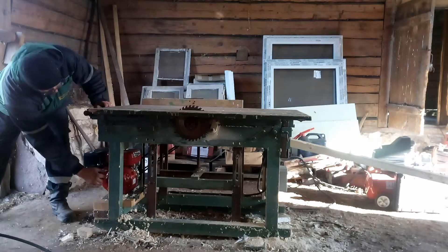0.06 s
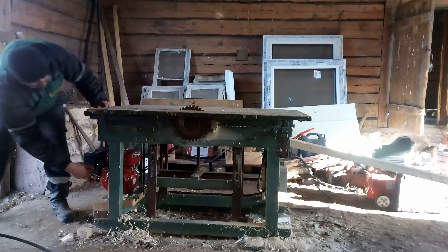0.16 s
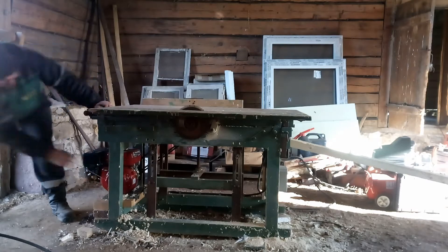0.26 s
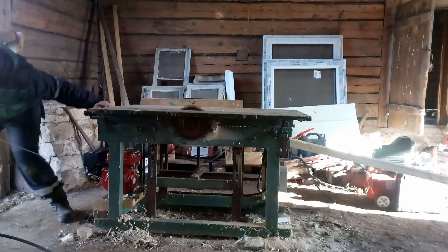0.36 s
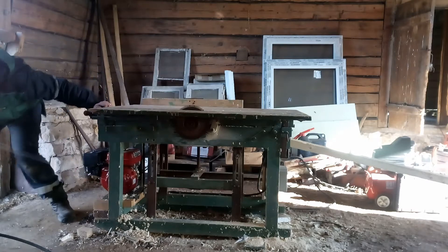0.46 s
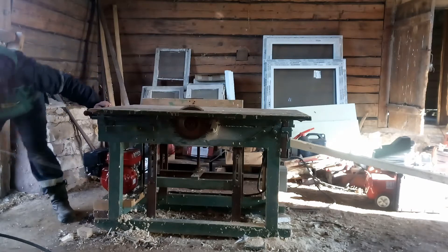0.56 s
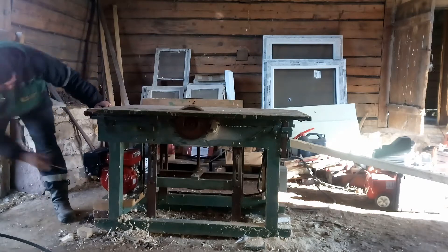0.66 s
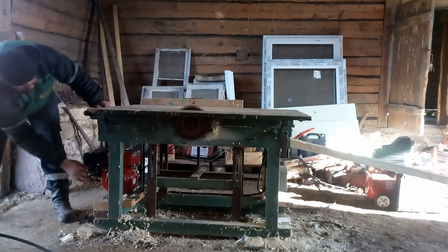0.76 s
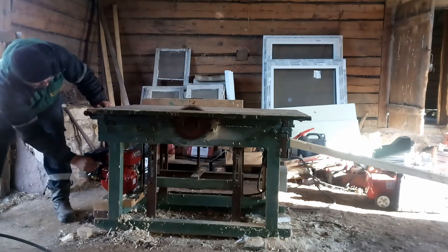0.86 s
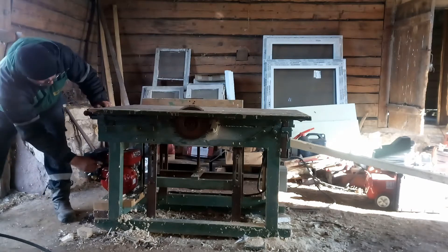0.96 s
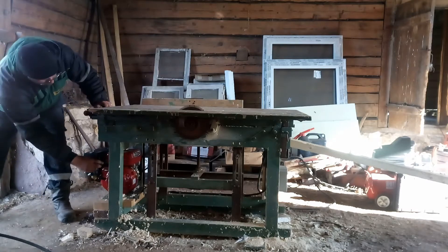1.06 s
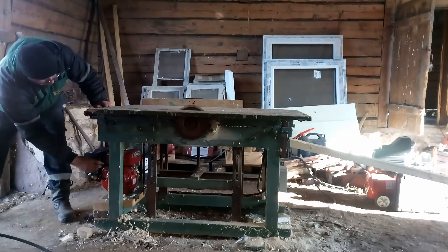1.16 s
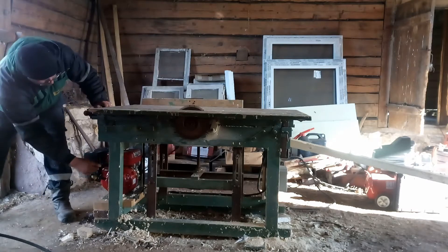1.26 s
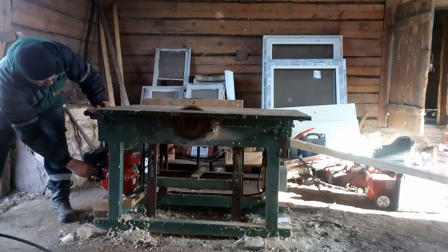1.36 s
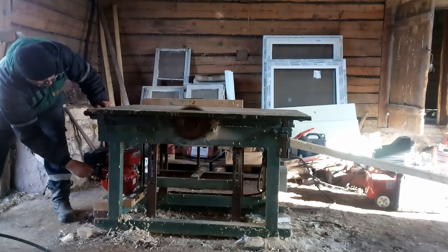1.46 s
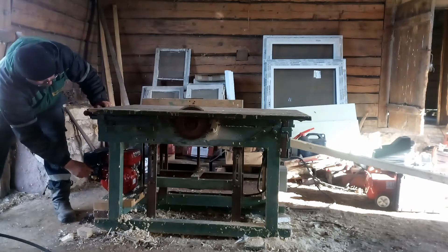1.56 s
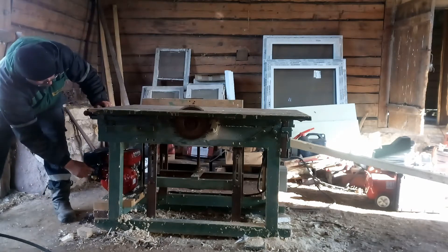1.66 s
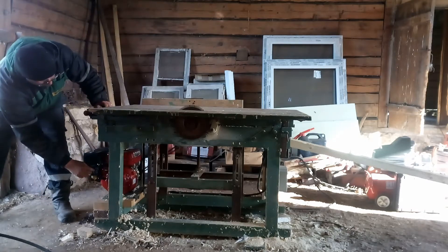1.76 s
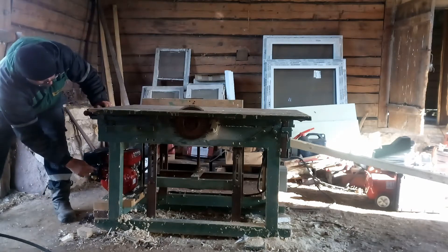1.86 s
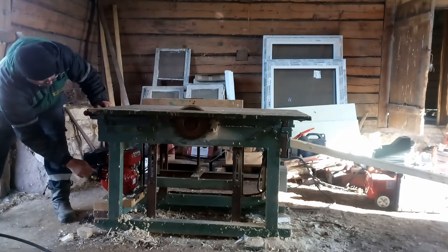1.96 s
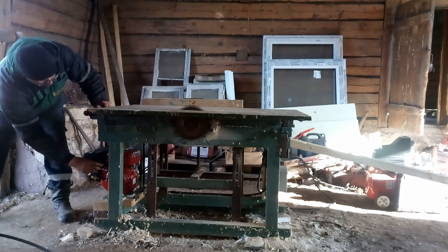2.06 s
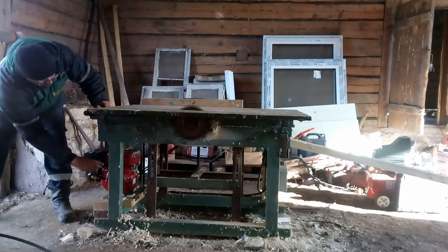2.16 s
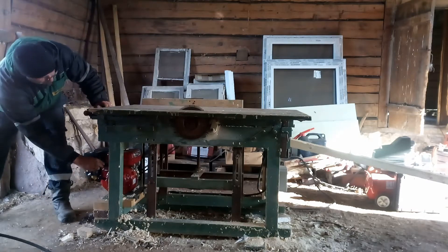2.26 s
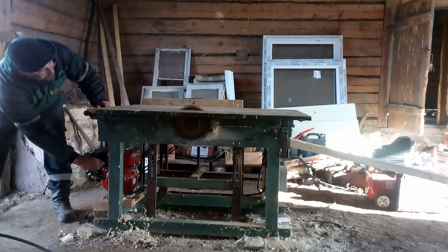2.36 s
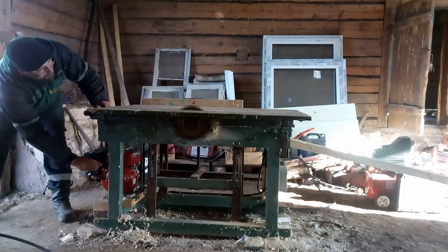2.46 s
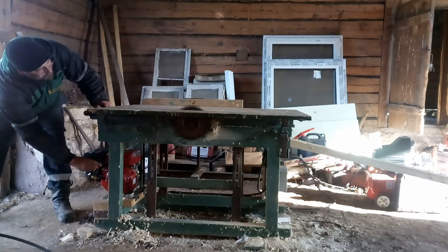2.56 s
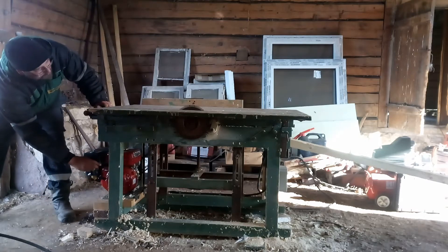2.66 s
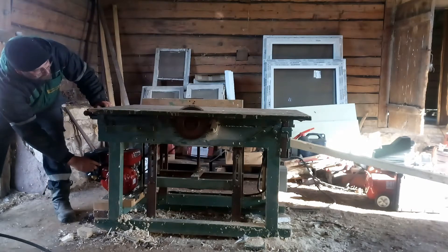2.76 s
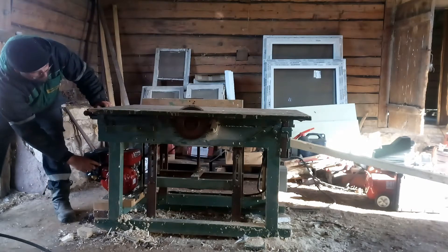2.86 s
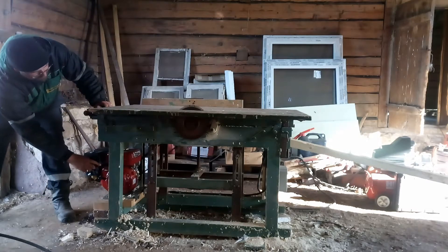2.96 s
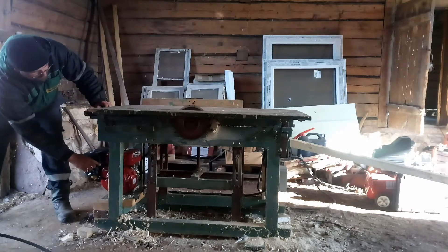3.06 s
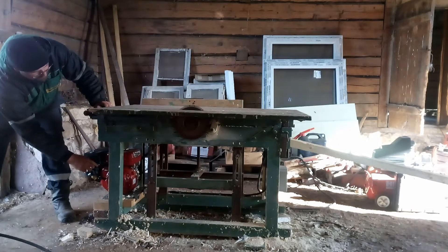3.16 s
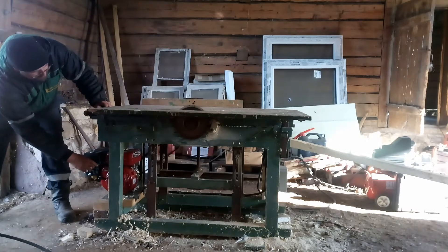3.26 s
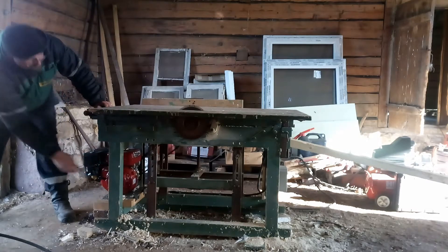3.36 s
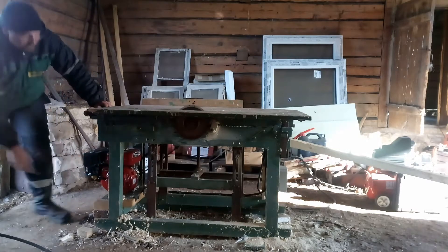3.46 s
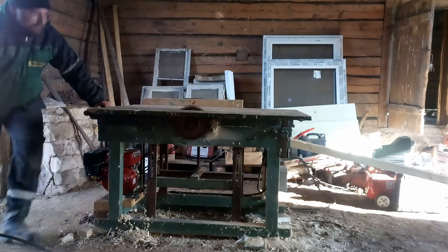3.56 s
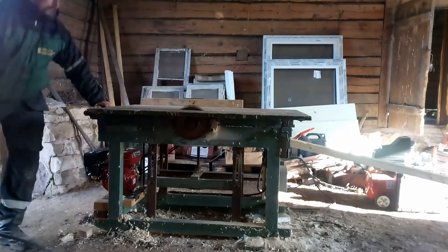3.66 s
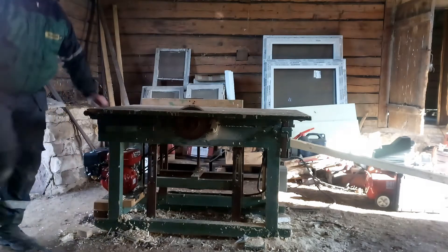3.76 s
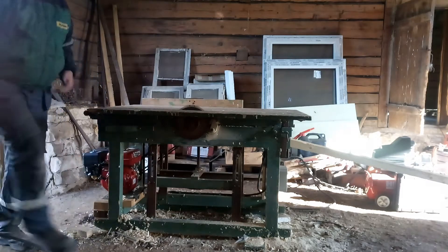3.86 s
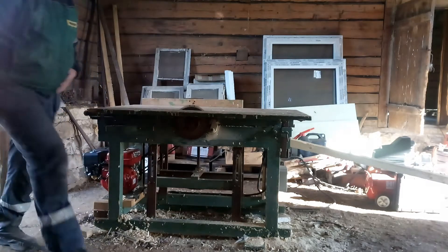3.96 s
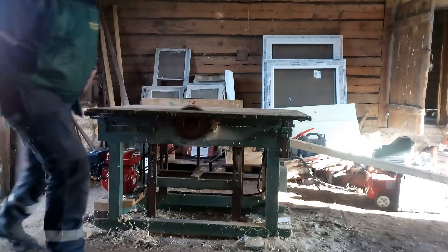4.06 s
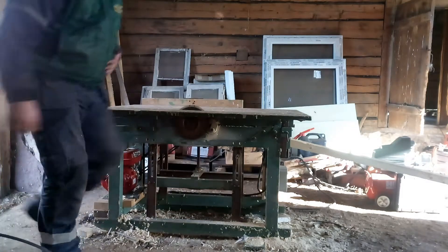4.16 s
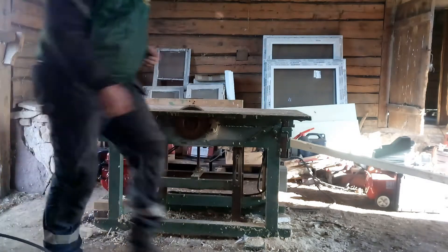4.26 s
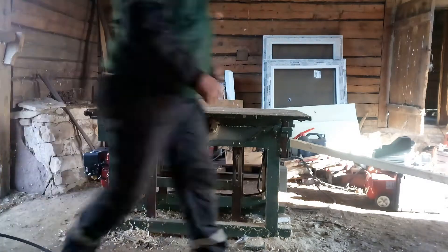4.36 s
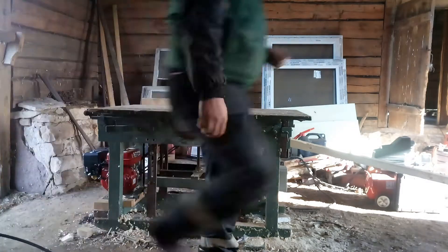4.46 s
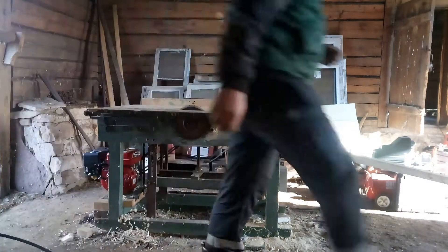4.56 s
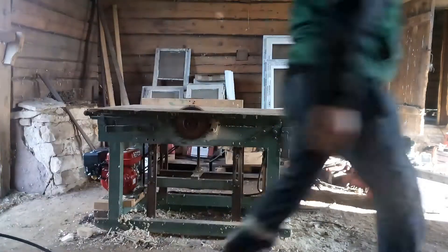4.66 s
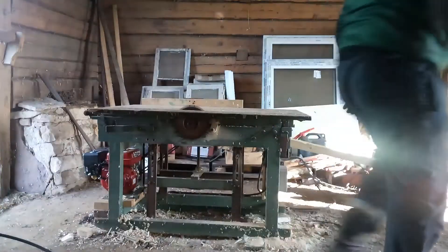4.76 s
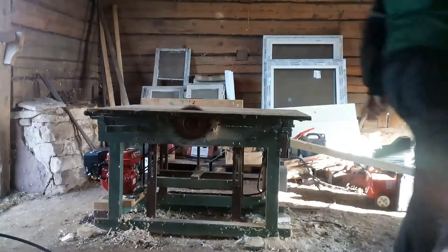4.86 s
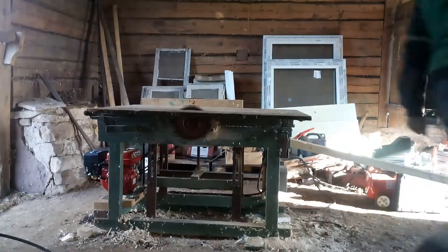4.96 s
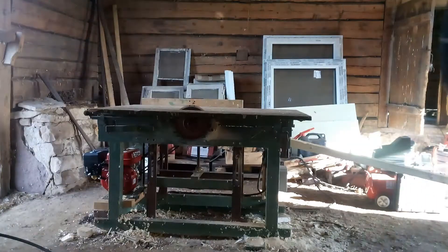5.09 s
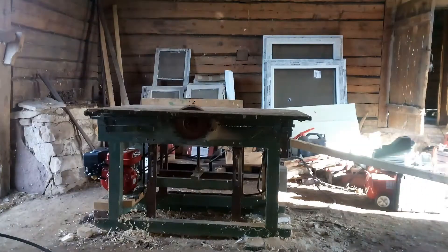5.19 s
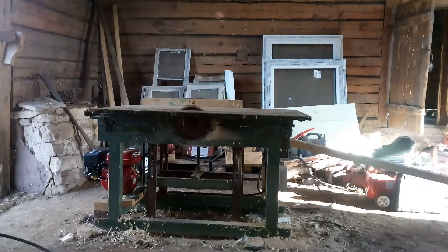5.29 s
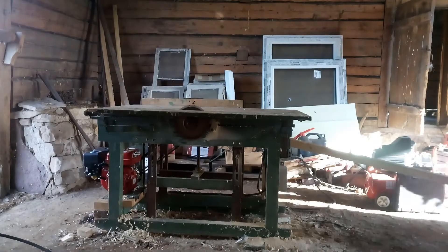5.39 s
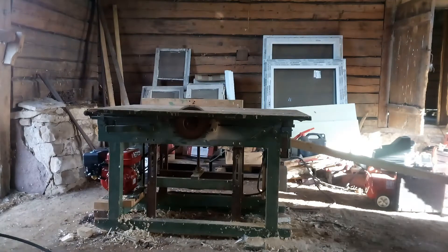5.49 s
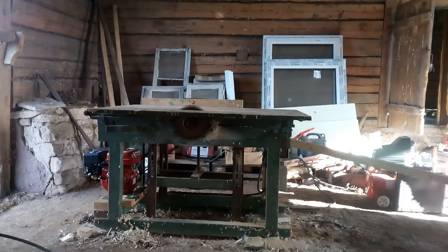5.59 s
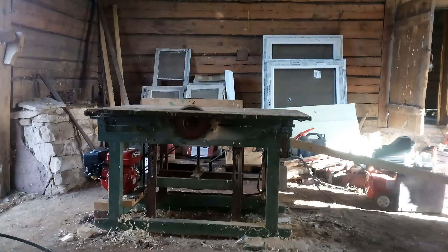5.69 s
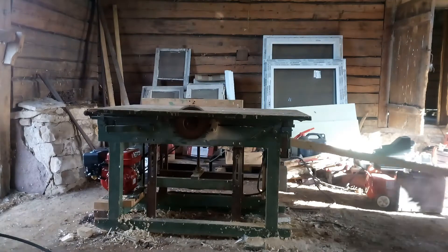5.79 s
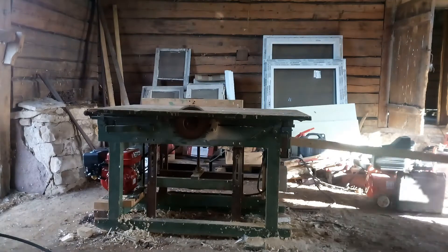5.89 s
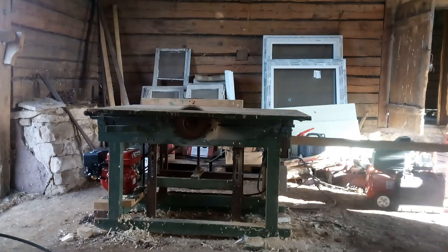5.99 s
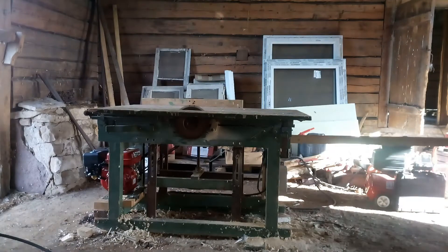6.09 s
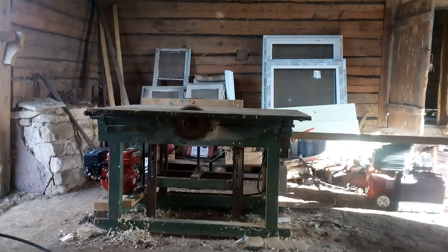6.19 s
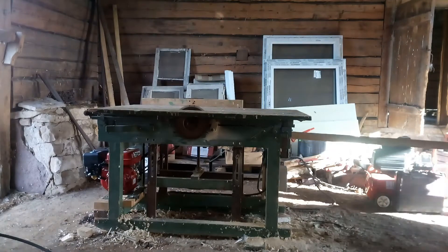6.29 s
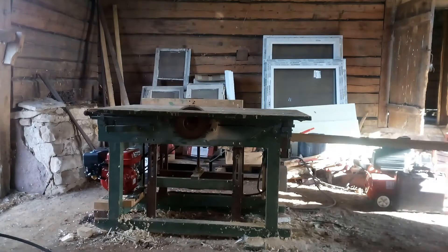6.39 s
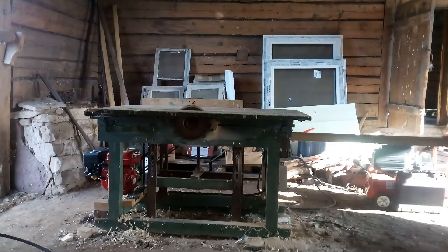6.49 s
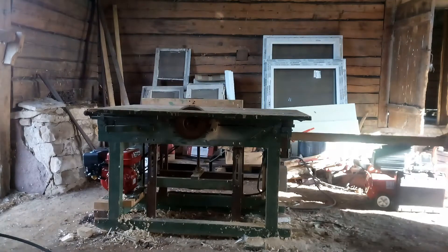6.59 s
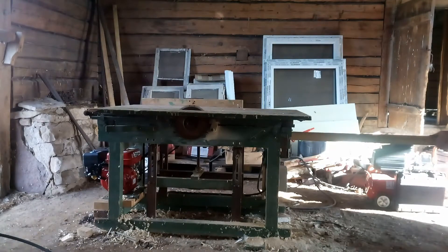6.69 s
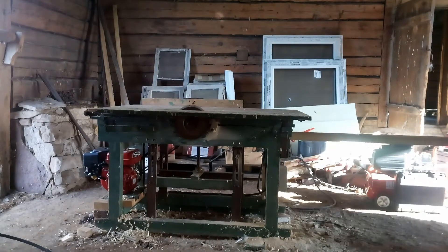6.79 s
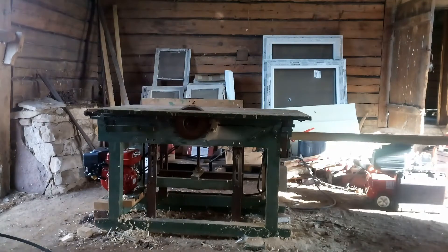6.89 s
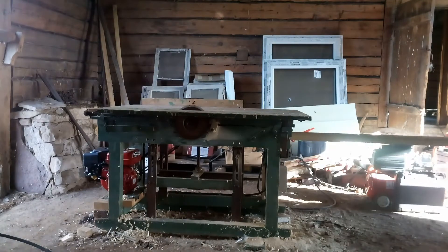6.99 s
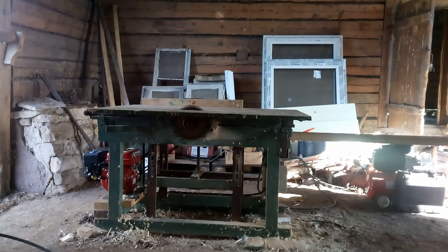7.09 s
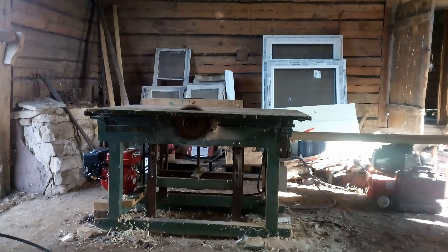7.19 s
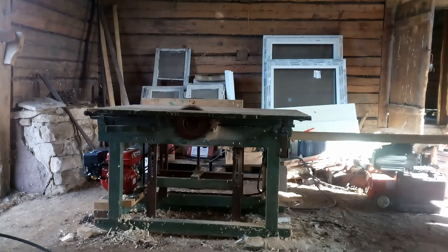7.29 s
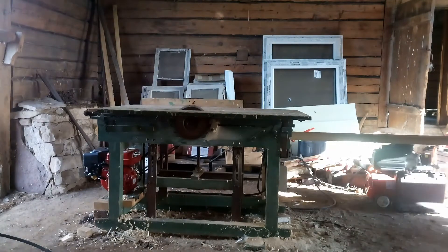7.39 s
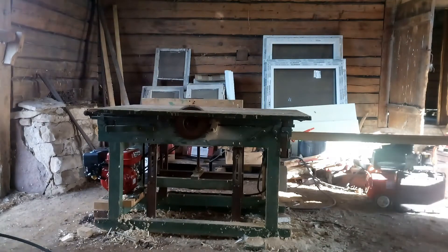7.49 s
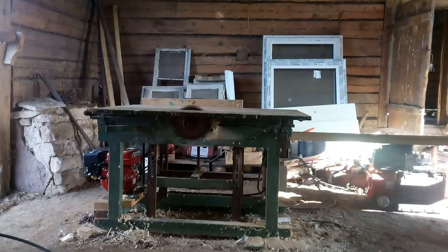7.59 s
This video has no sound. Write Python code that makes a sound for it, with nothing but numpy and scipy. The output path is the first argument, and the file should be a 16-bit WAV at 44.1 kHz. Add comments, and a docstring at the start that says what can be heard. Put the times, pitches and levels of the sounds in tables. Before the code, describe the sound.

The barn is almost silent, with faint air. At 0.1-0.2 s metal pawls clink and a dull bench knock lands. Around 0.25-0.4 s a starter rope makes a rough, rising zip, ending in hard knocks near 0.4 s. A small single-cylinder engine turns over with uneven deep pops; the rope reel chatters back at about 0.8 s with metallic clacks. The engine stumbles, gives a small rev around 1.45-1.6 s amid a few knocks, and settles to a soft, low putter by 1.9 s. At 2.4 s the throttle opens into a raspy roar, and again at 3.1 s. From about 3.2 s to the end near 7.5 s it runs fast and loud under load, a boomy three-beat chug with slight speed hunting, barking muffler, tinny valve clatter, loose rattles, and the wavering ring of the spinning saw blade. Short wooden-room echo, distant fixed microphone.

```python
"""Pull-started engine and bench saw in a barn

A rope clinks, zips and knocks through its starter; a single-cylinder four-stroke stumbles, with one small throttle
blip, and settles to a chug. Two wide blips come after; then the speed hunts on the governor and a belt-driven
saw rings. Each engine cycle sends out short pulses; filters turn them into boom, bark and clatter, with barn echo.
Shaped noise makes the gas, rattles and scrapes; wavering sine waves make the metal ring."""
import sys
import numpy as np
from scipy import signal
from scipy.fft import rfft, irfft
from scipy.io import wavfile
from scipy.ndimage import uniform_filter1d

SR = 44100
rng = np.random.default_rng(int(sys.argv[2]) if len(sys.argv) > 2 else 0)


def int16_out(signal):
    """Quantize to a 16-bit WAV file."""
    q = np.round(np.clip(np.atleast_2d(signal).T, -1, 1) * 32767)
    wavfile.write(sys.argv[1], SR, q.astype(np.int16))


N = 336924
T = np.arange(N) / SR  # time of each sample [s]


def undb(db):
    """Turn decibels into a gain."""
    return 10 ** (np.asarray(db) / 20)


def unit(x):
    """Scale to an average (rms) strength of 1."""
    return x / np.sqrt(np.mean(x ** 2) + 1e-20)


def even(x, size=9000):
    """Hold the running rms, over a window in samples, near 1 while keeping the single beats."""
    power = uniform_filter1d(uniform_filter1d(x * x, size), size)
    return x / np.sqrt(power + 1e-14)


def noise():
    """White noise: all pitches equally strong."""
    return rng.standard_normal(N)


def sway(hz):
    """Random wander with a spread of 1, made of noise below the given frequency."""
    return unit(signal.sosfilt(signal.butter(2, hz, fs=SR, output="sos"), noise()))


def ramp(start_s, rise_s):
    """A straight rise from 0 to 1."""
    return np.clip((T - start_s) / rise_s, 0, 1)


def fade(x, decay_s):
    """Give each pulse a tail that dies away exponentially."""
    return signal.lfilter([1], [1, -np.exp(-1 / (decay_s * SR))], x)


def colour(x, points, size=4096):
    """Filter to a (frequency [Hz], level [dB]) curve without sounding ahead of the input."""
    hz, db = np.transpose(points)
    f = np.log(np.maximum(np.fft.rfftfreq(size, 1 / SR), 1))
    # the response falls away beyond both ends of the curve
    outside = np.maximum(f - np.log(hz[-1]), 0) + np.maximum(np.log(hz[0]) - f, 0)
    response_db = np.interp(f, np.log(hz), db) - 20 * outside
    # folding the cepstrum gives the minimum-phase filter
    cepstrum = irfft(np.log(undb(response_db)))
    cepstrum[1:size // 2] *= 2
    cepstrum[size // 2 + 1:] = 0
    return signal.oaconvolve(x, irfft(np.exp(rfft(cepstrum))))[:N]


def resonate(x, hz, width_hz):
    """A resonance picks out one narrow band and rings on."""
    return signal.lfilter(*signal.iirpeak(hz, hz / width_hz, fs=SR), x)


BARN_T60_S = 0.4  # time for the echo to fall by 60 dB


def barn(x, wet_db):
    """Direct sound plus the dense, short echo of the plank walls."""
    t = T[:SR // 2]
    dying = np.exp(-np.log(1000) * t / BARN_T60_S)
    tail = rng.standard_normal(len(t)) * dying * (t > .004)
    echo = signal.oaconvolve(x, tail / np.linalg.norm(tail))[:N]
    return x + undb(wet_db) * echo


def blow(s, db, decay_s):
    """Loose parts meet one after another: a knock swells, slower if light, then dies away."""
    swell_s = np.interp(db, [-58, -45], [.018, .006])
    past_peak = T - s - .005  # the peak comes 5 ms after the listed time
    swell = np.clip(1 + past_peak / swell_s, 0, 1)
    return undb(db) * np.exp(-np.clip(past_peak / decay_s, 0, 50)) * swell


def ringing(modes, waver):
    """Metal modes that waver in pitch as parts rattle against them."""
    out = 0
    for hz, db in modes:
        phase = 2 * np.pi * np.cumsum(hz * (1 + waver * sway(hz=201))) / SR
        out = out + undb(db) * np.sin(phase)
    return unit(out)


def strokes(cycle, at, scatter_db, jitter_s):
    """One pulse a cycle at a given position, each with its own strength and timing."""
    count = np.arange(np.ceil(cycle[0]), np.floor(cycle[-1]))
    chance = rng.standard_normal((200, 2))[:len(count)]
    when = np.interp(count + at, cycle, T) + jitter_s * chance[:, 0]
    sample = np.clip(when * SR, 0, N - 1).astype(int)
    return np.bincount(sample, undb(scatter_db * chance[:, 1]), N)


# starter pawls dropping into the cup: (time [s], level [dB], decay [s])
PAWL_CLICKS = [(0.121, -49, 0.012), (.134, -35.5, 0.0077), (.16, -48, 0.009)]
# ringing modes of the starter cup: (frequency [Hz], level [dB])
CUP_MODES = [(660, 10), (813, 4), (980, 8), (1080, -5), (1500, -23), (1943, -15), (2929, -12), (3350, -16),
             (3700, -18), (4400, -22)]


def pawls():
    """The pawls clink against the starter cup as the slack is taken up."""
    clicks = sum(blow(s, db, decay) for s, db, decay in PAWL_CLICKS)
    return clicks * ringing(CUP_MODES, waver=0.015)


# knocks of starter and controls, with light valve ticks as the engine stumbles;
# ring and rattle are relative to the knock:
# (time [s], level [dB], decay [s], metallic ring [dB], rattle [dB])
KNOCKS = [(0.138, -32.5, 0.029, -29, -39), (0.162, -51, 0.017, -16, -34.5), (0.385, -45, 0.02, -7, -3),
          (0.407, -31.5, 0.015, -0.5, -6.5), (0.435, -26, 0.0061, -12, -31), (.576, -64, 0.011, 5, -1),
          (.664, -62.5, 0.01, 5, 2), (.737, -60, .009, 6, -5), (0.772, -45, 0.0066, 2, -2),
          (0.783, -41, 0.013, 18, -2), (0.811, -37.5, 0.0084, 4.5, -16.5), (0.881, -61, 0.0073, 3, 2),
          (.944, -57, 0.011, 10, -4), (1.015, -61, 0.01, 2, 1.5), (1.084, -55, 0.0083, 0, -0.5),
          (1.15, -58.5, 0.0091, 1, -1), (1.453, -49.5, 0.0088, 0.5, -2), (1.526, -39.5, 0.028, -1.5, -20),
          (1.571, -47.5, 0.012, -8, 4.5), (1.645, -44, 0.022, 6, -11)]
# ringing modes of the starter housing: (frequency [Hz], level [dB])
HOUSING_MODES = [(441, 7.5), (646, 2), (908, -5.5), (1036, -4.5), (1114, 0), (1310, -5.5), (1510, -9),
                 (2000, -16), (2295, -14.5), (2680, -26), (3880, -16), (5030, -28), (6100, -31)]
# colour of the dull part of a knock: (frequency [Hz], level [dB])
THUD_COLOUR = [(60, -42), (140, -27), (188, 14.5), (260, -3), (640, -2), (1000, -13.5), (1600, -23.5),
               (2300, -43.5), (3300, -31), (5000, -47)]
# colour of the bright part of a knock: (frequency [Hz], level [dB])
RATTLE_COLOUR = [(600, 12.5), (1500, 11), (3400, 3), (5500, -6.5), (8000, -16.5), (13000, -29),
                 (15500, -17)]
BENCH_HZ = 188.5  # pitch of the bench's boom


def knocks():
    """Starter and controls knock and valves tick lightly: thud, bench boom, metal ring and rattle."""
    dull, metal, bright = np.zeros((3, N))
    for s, db, decay, ring_db, rattle_db in KNOCKS:
        hit = blow(s, db, decay)
        dull += hit
        metal += hit * undb(ring_db)
        bright += hit * undb(rattle_db)
    thud = even(colour(noise(), THUD_COLOUR), size=900) + 0.4 * np.sin(2 * np.pi * BENCH_HZ * T)
    rattle = unit(colour(noise(), RATTLE_COLOUR))
    return dull * thud + metal * ringing(HOUSING_MODES, waver=0.014) + bright * rattle


# muffler and barn colour at slow idle: (frequency [Hz], level [dB])
BOOM_SLOW = [(20, -16.5), (48, -17.5), (73, -5), (100, -4), (140, -7.5), (200, -0.5), (245, -1),
             (310, -17.5), (450, -35)]
# muffler and barn colour under load: (frequency [Hz], level [dB])
BOOM_FAST = [(20, -11), (48, -17), (64, -19.5), (85, -1), (105, -2), (128, -4), (160, 4), (192, -4),
             (215, 3.5), (260, -9.5), (320, -17.5), (450, -38)]
# puffs of one cycle under load: (position [cycles], level [dB], scatter [dB])
PUFFS = [(0, 0.5, 0.46), (0.334, -5.5, 1.6), (0.665, -3, 2)]
# muffler and barn modes the puffs keep humming: (frequency [Hz], width [Hz], gain [dB])
HUM_MODES = [(128.9, 7, -1.5), (194, 13, -5)]


def exhaust(cycle, load, opening):
    """Exhaust and intake puffs boom: a soft putter, a roar in a blip, a three-beat chug under load."""
    firing = strokes(cycle, 0, scatter_db=0.0, jitter_s=0.0004)
    intake = strokes(cycle, 0.4614, scatter_db=3.0, jitter_s=0.00057)
    turbulence = (.5 + .8 * opening) * noise()
    putts = even(barn(firing + .68 * intake, wet_db=-4.0)) + turbulence
    puffs = 0
    for at, db, scatter in PUFFS:
        puffs = puffs + undb(db) * strokes(cycle, at, scatter_db=scatter, jitter_s=0.00018)
    hum = sum(undb(db) * resonate(puffs, hz, width) for hz, width, db in HUM_MODES)
    chug = even(barn(puffs, wet_db=-5.5) + hum) + .38 * noise()
    slow = unit(colour(putts, BOOM_SLOW))
    loaded = unit(colour(chug, BOOM_FAST))
    return even((1 - load) * slow + load * loaded)


# colour of the shaken muffler shell and bench: (frequency [Hz], level [dB])
BARK_COLOUR = [(200, -28.5), (300, 0.5), (380, 1), (460, -3), (600, -6.5), (720, -10), (1000, -11.5),
               (1200, -16), (1400, -20.5), (1800, -29), (2500, -41.5)]


def bark(cycle):
    """Each stroke shakes the muffler shell and bench, with a rush of gas behind it."""
    hits = strokes(cycle, 0, scatter_db=0.5, jitter_s=0.00017)
    for at, db in [(.17, -4), (.45, -0.5), (.62, -2.5), (.84, -3)]:  # (position in cycles, dB)
        hits = hits + undb(db) * strokes(cycle, at, scatter_db=2.2, jitter_s=0.00023)
    gas = unit(fade(hits, decay_s=0.018) * noise())
    # the muffler faces the wall, so its knocks arrive mostly as echo
    return even(colour(unit(barn(hits, wet_db=17.0)) + 0.9 * gas, BARK_COLOUR))


# colour of the clatter as a whole: (frequency [Hz], level [dB])
CLATTER_COLOUR = [(1100, -20), (1700, 1), (2000, 7.5), (2350, 4), (2550, -2), (2950, 0.5), (3500, -3.5),
                  (4200, -6.5), (5100, -11), (5900, -15.5), (6800, -31.5), (7800, -25), (10000, -29.5),
                  (13500, -38.5), (15200, -23)]
# resonances of valve cover and shroud: (frequency [Hz], width [Hz], gain [dB])
COVER_MODES = [(1890, 180, 0.5), (2610, 320, -1), (3530, 300, 2.5), (4840, 110, -0.5), (6200, 70, 0.5),
               (7660, 110, 13), (8300, 69, 4), (9580, 150, 8)]
GRIT_PER_S, GRIT_DB = 150, -7  # chatter of loose guards and belt: mean rate [1/s], level in the shake [dB]


def clatter(cycle, load):
    """Valve gear ticks ring a tin cover; under load loose parts chatter too, all over the fan's hiss."""
    ticks = strokes(cycle, .03, scatter_db=1.6, jitter_s=.0005)
    ticks = ticks + (.4 + .5 * load) * strokes(cycle, .53, scatter_db=1.6, jitter_s=.0005)
    shaken = fade(fade(ticks, decay_s=0.003), decay_s=0.009)
    metal = even(barn(shaken * noise(), wet_db=0.0))
    loose = (rng.random(N) < GRIT_PER_S / SR) * undb(2 * noise()) * shaken
    grit = unit(fade(loose, decay_s=.003) * noise())
    hiss = (0.15 + 0.15 * load) * noise()
    shake = metal + load * undb(GRIT_DB) * grit + hiss
    ring = 0
    for hz, width, db in COVER_MODES:
        flutter = undb(5.5 * sway(hz=22) - 4)
        ring = ring + undb(db) * flutter * resonate(shake, hz, width)
    return even(colour(shake + ring, CLATTER_COLOUR))


# starter shell as the rope excites it: (frequency [Hz], gain [dB])
SHELL_COLOUR = [(250, 3), (480, 14), (800, 4), (1100, 1), (1380, 7), (1800, -4.5), (2400, -10), (3400, -3),
                (4500, -5), (7000, -21)]
PULL_S, PULL_LENGTH_S, PULL_RISE_S, PULL_RELEASE_S = .25, 0.1, 0.055, 0.05
ROPE_START_HZ, ROPE_RISE_HZ_PER_S = 317, 6400  # basic pitch of the jerks and how fast it climbs
ROPE_DB = -46  # gain after the shell


def rope():
    """The braid jerks through its eyelet ever faster, a rough rising zip in the starter shell."""
    pulled_s = np.clip(T - PULL_S, 0, PULL_LENGTH_S + PULL_RELEASE_S)
    hz = ROPE_START_HZ + ROPE_RISE_HZ_PER_S * pulled_s
    pull = ramp(PULL_S, PULL_RISE_S) * (1 - ramp(PULL_S + PULL_LENGTH_S, PULL_RELEASE_S))
    braid = 2 * np.pi * np.cumsum(hz * (1 + .125 * sway(hz=600))) / SR
    tone = .5 * np.sin(braid) + np.sin(2 * braid) + .7 * np.sin(3 * braid)
    jerks = undb(4 * sway(hz=220)) * tone
    return undb(ROPE_DB) * pull * colour(unit(jerks) + 0.24 * noise(), SHELL_COLOUR)


# uneven firings while the engine catches, before their filters:
# (time [s], muffler ring [dB], deep thump [dB])
POPS = [(0.388, -27, -29), (0.505, -31, -36), (0.528, -32.5, -36.5), (0.589, -34.5, -36), (0.621, -40, -39),
        (.695, -34, -40), (0.741, -36, -38), (0.763, -28.5, -34), (0.839, -30, -33), (0.898, -28.5, -29),
        (0.964, -30, -34), (1.041, -29.5, -27), (1.126, -46, -27.5), (1.218, -27, -28.5),
        (1.276, -29.5, -27.5), (1.316, -28.5, -34), (1.39, -28.5, -29), (1.46, -32, -21.5),
        (1.522, -26.5, -22.5), (1.571, -38, -15.5), (1.705, -27.5, -29)]
# the muffler's ring after a lone firing: (frequency [Hz], gain [dB])
POP_RING = [(100, 10.5), (150, 48), (205, 50), (255, 46), (330, 30.5), (550, 39), (1000, 0.5), (2000, -22)]
# the deep thump of a lone firing: (frequency [Hz], gain [dB])
POP_THUMP = [(25, -6.5), (45, 26), (70, 45.5), (102, 50), (135, 40), (250, 12)]


def pops():
    """Single strong firings ring the muffler and thump before the engine runs evenly."""
    ring, thump = np.zeros((2, N))
    for s, ring_db, thump_db in POPS:
        ring[int(s * SR)] += undb(ring_db)
        thump[int(s * SR)] += undb(thump_db)
    shudder = fade(thump, decay_s=0.044) * noise()  # the engine shakes on its mount after each firing
    deep = colour(.75 * thump + .03 * shudder, POP_THUMP)
    return barn(colour(ring, POP_RING) + deep, wet_db=-1.0)


# colour of the reel's chatter: (frequency [Hz], level [dB])
RECOIL_COLOUR = [(300, -12), (450, -0.5), (900, -3), (1350, -5), (1800, -9.5), (2300, -12), (2800, -13),
                 (3300, -19), (3900, -20), (4500, -28), (6200, -28), (8000, -48)]
RECOIL_S, RECOIL_RISE_S, RECOIL_HOLD_S, RECOIL_FALL_S = .774, 0.0093, 0.023, .014  # fall starts at S + HOLD
RECOIL_HZ, RECOIL_DB = 455, -30  # mean tap rate and level


def recoil():
    """The reel chatters against its shell in quick, uneven taps as the rope winds back in."""
    turns = np.floor(np.cumsum(RECOIL_HZ * (1 + .05 * sway(hz=300))) / SR)
    taps = np.diff(turns, prepend=0) * undb(2 * noise())
    swell = ramp(RECOIL_S, RECOIL_RISE_S) * (1 - ramp(RECOIL_S + RECOIL_HOLD_S, RECOIL_FALL_S))
    return undb(RECOIL_DB) * swell * unit(colour(taps, RECOIL_COLOUR))


# harmonics of the engine cycle that hum at slow idle: (multiple of cycle rate, level [dB])
DRONE = [(5, -35), (10, -45), (13, -31), (16, -38.5)]


def drone(cycle, idle):
    """Cycle harmonics of the slow idle, each swaying a little in strength and phase."""
    out = 0
    for multiple, db in DRONE:
        level = undb(db + 1.4 * sway(hz=1.0))
        phase = 2 * np.pi * multiple * cycle + .17 * sway(hz=3)
        out = out + level * np.sqrt(2) * np.cos(phase)
    return idle * out


# blips of the throttle:
# (time [s], opening time [s], start of shutting after time [s], shutting time [s], opening [0-1])
BLIPS = [(1.44, 0.11, 0.16, 0.047, 0.31), (2.405, 0.13, 0.19, 0.054, 0.97),
         (3.11, 0.079, 0.16, 0.093, 0.83)]


def throttle():
    """Each blip opens the throttle, holds it and lets it shut."""
    return sum(opening * (ramp(s, rise) - ramp(s + held, fall)) for s, rise, held, fall, opening in BLIPS)


# colour of the wide-throttle rasp: (frequency [Hz], level [dB])
RASP_COLOUR = [(200, 1.5), (300, 26.5), (400, 23), (470, 38.5), (560, 26.5), (900, 18.5), (1500, 1),
               (2500, 0), (4000, -3.5), (6000, -9.5), (8000, -16), (11000, -23.5), (14000, -27),
               (15200, -14.5)]
RASP_DB, RASP_RANGE_DB = -22.5, 8  # level wide open; extra fall as the throttle shuts


def rasp(cycle, opening):
    """An open throttle tears crackling gusts through the muffler on every crank turn, shaking tinware."""
    bursts = sum(strokes(cycle, at, scatter_db=2.0, jitter_s=0.001) for at in (0, .5))
    gusts = fade(fade(bursts, decay_s=0.003), decay_s=0.016)
    crackle = undb(4 * sway(hz=900)) * noise()
    gas = even(barn(gusts * crackle, wet_db=-7))
    level = opening * undb(RASP_DB - RASP_RANGE_DB * (1 - opening))
    return level * unit(colour(gas, RASP_COLOUR))


# ringing of the spinning blade and bench, before BLADE_DB: (frequency [Hz], width [Hz], level [dB])
BLADE_MODES = [(279.7, 4.7, -34), (349.5, 5, -33), (416, 7.6, -34), (544, 6, -33), (766, 5.4, -46),
               (842, 7.5, -45), (1080, 5.2, -45.5), (1205, 7, -42), (1437, 20, -52.5), (6000, 22, -87.5),
               (6370, 14, -93.5)]
BLADE_DB = -2  # added to every mode


def blade():
    """The spinning blade and the bench ring on in narrow modes that waver in pitch and strength."""
    out = 0
    for hz, width, db in BLADE_MODES:
        phase = 2 * np.pi * np.cumsum(hz + 0.403 * width * sway(hz=7.08)) / SR
        flutter = undb(1.5 * sway(hz=7))
        out = out + undb(db + BLADE_DB) * flutter * np.sqrt(2) * np.sin(phase)
    return out


def loudness(steps_db, state):
    """Gain of a part: its stumbling level plus a step each for catching, speed, load and throttle."""
    return undb(steps_db[0] + sum(db * amount for db, amount in zip(steps_db[1:], state)))


# the run-up from the first turns: (time [s], four-stroke cycle rate [Hz])
RUN_UP = [(.6, 12.2), (.75, 14.3), (1.15, 14.6), (1.45, 12.8), (1.7, 14.6), (1.85, 14.7), (2.1, 15.2),
          (2.43, 15.8), (2.62, 20.9), (2.85, 21.17), (3.13, 20.2)]
# the governor hunting around working speed: (time [s], four-stroke cycle rate [Hz])
HUNT = [(3.4, 21.45), (3.84, 20.62), (4.13, 22.01), (4.33, 20.74), (4.5, 21.77), (4.68, 21.24),
        (4.81, 21.64), (5.31, 20.41), (5.55, 21.58), (5.8, 20.47), (6.01, 21.25), (6.27, 21.91),
        (6.41, 20.82), (6.88, 21.63), (6.99, 20.64), (7.31, 20.8), (7.42, 21.71)]
# Loudness of boom, bark and clatter; the blip step shrinks under load:
# (stumbling [dB], added once caught [dB], at full speed [dB], under load [dB], in a full blip [dB])
BOOM_DB = (-42, 11.5, 3.5, 8, 8.5)
BARK_DB = (-41, 4.5, 6.5, 4, 6)
CLATTER_DB = (-72.5, 0, 14, 6.5, 7.5)
IDLE_HZ, WORK_HZ = 15.6, 20.93  # cycle rates of slow idle and of full speed
CRANK_S, CRANK_RISE_S = 0.24, 0.14  # the pull sets the engine turning
CATCH_S, CATCH_RISE_S = 1.05, 0.84  # it stops stumbling and runs evenly
LOAD_S, LOAD_RISE_S = 3.16, 0.071  # the engine starts pulling the saw
FLOOR_DB = -65.5  # level of the barn's air


def scene():
    """Engine, saw and starter over the faint air of the barn."""
    hz = np.interp(T, *np.transpose(list(RUN_UP) + list(HUNT)))
    cycle = np.cumsum(hz) / SR
    cycle -= np.interp(1.884, T, cycle)  # a firing falls at 1.884 s
    speed = np.clip((hz - IDLE_HZ) / (WORK_HZ - IDLE_HZ), 0, 1)
    caught = ramp(CATCH_S, CATCH_RISE_S)
    load = ramp(LOAD_S, LOAD_RISE_S)
    opening = throttle()
    state = caught, speed, load, opening * (1 - 0.76 * load)
    engine = loudness(BOOM_DB, state) * exhaust(cycle, load, opening)
    engine += loudness(BARK_DB, state) * bark(cycle)
    engine += loudness(CLATTER_DB, state) * clatter(cycle, load)
    engine += drone(cycle, idle=caught ** 2 * (1 - speed))
    engine += rasp(cycle, opening)
    engine *= ramp(CRANK_S, CRANK_RISE_S)
    starter = barn(pawls() + knocks() + rope() + recoil(), wet_db=-18.5)
    air_colour = [(30, 0.5), (300, -4.5), (1000, -12.0), (3000, -26.0), (15000, -39.0)]  # (Hz, dB)
    air = undb(FLOOR_DB) * unit(colour(noise(), air_colour))
    return (starter + engine + pops() + load * blade() + air)[None]


TOP_HZ = 15600  # upper edge of the treble


def record(dry):
    """A steep low-pass filter cuts the treble above TOP_HZ."""
    return signal.sosfilt(signal.ellip(8, .2, 70, TOP_HZ, fs=SR, output="sos"), dry)


dry = scene()
out = record(dry)
int16_out(out)
```